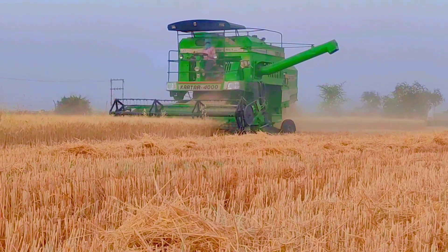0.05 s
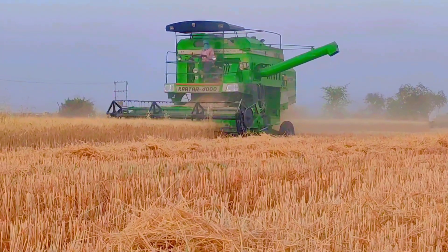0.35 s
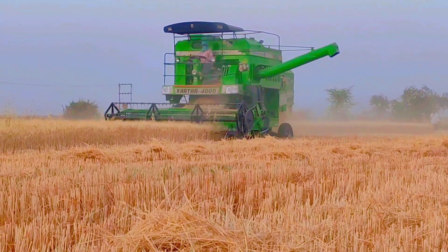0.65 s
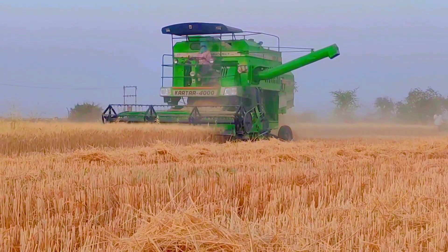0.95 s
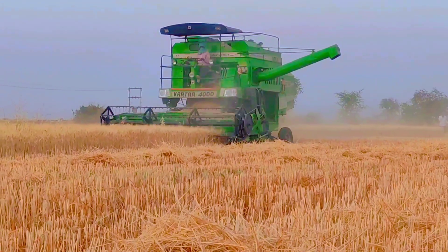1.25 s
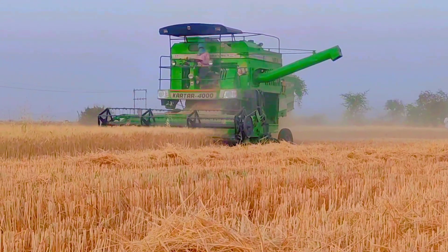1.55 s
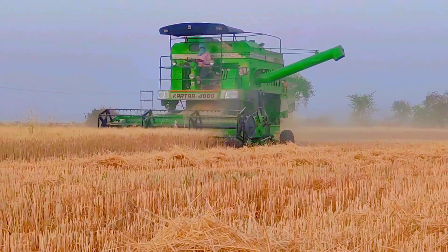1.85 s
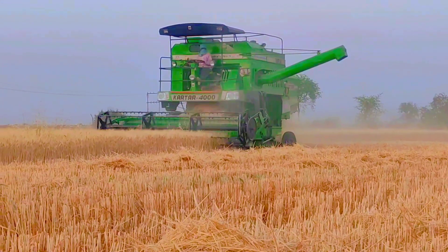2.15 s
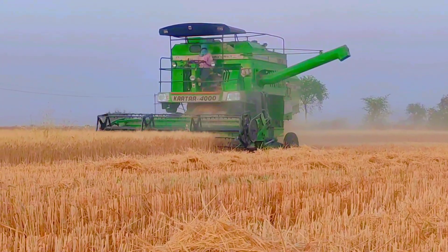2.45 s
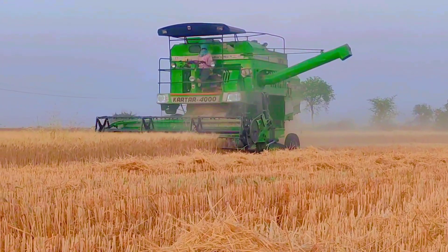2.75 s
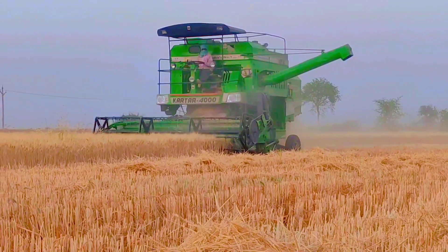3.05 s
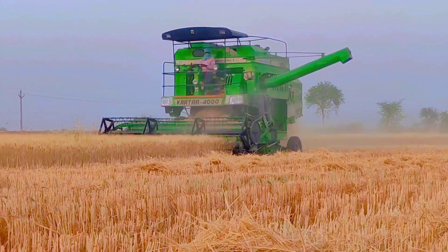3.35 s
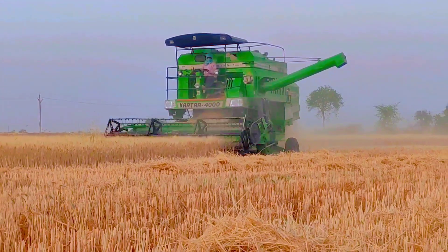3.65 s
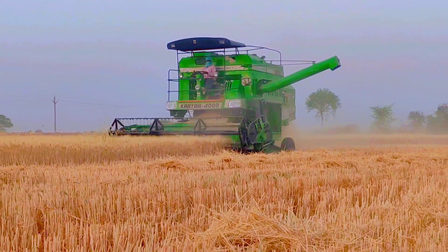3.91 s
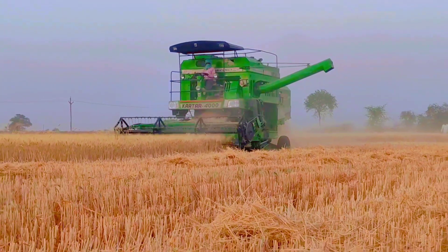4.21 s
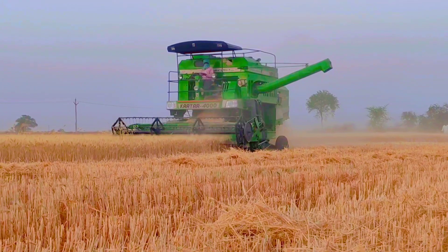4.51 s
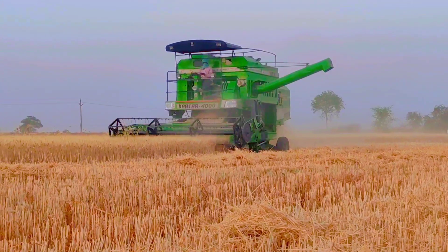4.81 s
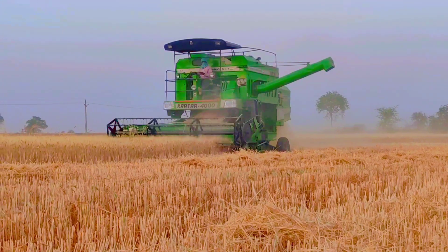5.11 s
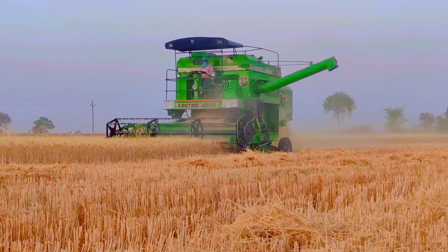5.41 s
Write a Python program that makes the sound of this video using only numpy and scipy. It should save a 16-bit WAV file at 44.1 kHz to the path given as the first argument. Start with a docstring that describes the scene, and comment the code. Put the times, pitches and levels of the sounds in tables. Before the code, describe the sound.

Steady diesel drone, threshing roar and rhythmic straw hiss from a slowly approaching harvester, with brief wind buffets and faint clinks.

```python
"""Open wheat field, one microphone, a combine harvester creeping in from 26 m to about 21 m. From the start its
six-cylinder diesel drones under rumbling panels and the roar of the threshing drum, while the cutter bar chops
dry straw in quick hissing strokes. From 0.7 s on, wind buffets the microphone now and then. At 3 s loose steel
clinks; at 3.4 s a hard knock on the microphone overloads the input. Five more clinks follow between 4 and 4.7
s, and a last buffet comes just before the end."""
import sys
import numpy as np
from scipy import signal
from scipy.fft import rfft, irfft
from scipy.io import wavfile

SR = 44100
rng = np.random.default_rng(int(sys.argv[2]) if len(sys.argv) > 2 else 0)


def store_wav(level_fs):
    """Save 16-bit WAV to argv[1]."""
    pcm = np.round(np.clip(np.atleast_2d(level_fs), -1, 1) * 32767)
    wavfile.write(sys.argv[1], SR, pcm.T.astype(np.int16))


N = 245637

CRANK_HZ = 8.47  # turns a second of the crank that drives the knife


def gain_of(db):
    """Decibels to an amplitude factor."""
    return 10 ** (np.asarray(db) / 20)


def unit_rms(x):
    """Scales to rms 1."""
    return x / np.sqrt(np.mean(x ** 2) + 1e-20)


def clock():
    """Time of every sample in seconds."""
    return np.arange(N) / SR


def colour(x, spectrum, skirt_db=60):
    """Filters x by (Hz, dB) points, falling by skirt_db an octave beyond their ends; rms 1."""
    octave = np.log2(np.fft.rfftfreq(N, 1 / SR) + 1)
    hz, db = np.transpose(spectrum)
    octaves_beyond = abs(octave - np.clip(octave, np.log2(hz[0]), np.log2(hz[-1])))
    curve_db = np.interp(octave, np.log2(hz), db) - skirt_db * octaves_beyond
    return unit_rms(irfft(rfft(x) * gain_of(curve_db), N))


def drift(rate_hz):
    """Random wander of rms 1, up to about the given rate."""
    t = np.arange(0, N / SR + 1, 1 / 200)
    hz = np.fft.rfftfreq(len(t), t[1])
    lowpass = (hz > 0) / (1 + (hz / rate_hz) ** 4)
    wander = irfft(rfft(rng.standard_normal(len(t))) * lowpass, len(t))
    return np.interp(clock(), t, unit_rms(wander))


def grains(per_s, spread_db):
    """Random tiny impacts, mostly small and a few large; rms 1."""
    size = gain_of(spread_db * np.minimum(rng.exponential(1, N), 4))
    polarity = rng.choice([-1, 1], N)
    struck = rng.random(N) < per_s / SR
    return unit_rms(size * polarity * struck)


def tone(turns, db):
    """A sine of the given rms level that follows a count of turns."""
    return np.sqrt(2) * gain_of(db) * np.sin(2 * np.pi * (turns + rng.random()))


def approach(loss_db_per_m=0, start_m=26.3, speed_m_per_s=1.0):
    """Gain from 1 up as the machine nears: 1 / distance, and less standing crop to soak up sound."""
    travelled_m = speed_m_per_s * clock()
    return start_m / (start_m - travelled_m) * gain_of(loss_db_per_m * travelled_m)


def engine(firing_hz=95.43, waver_db=1.4):
    """The governed diesel holds its speed; unequal cylinders add tones between the firing multiples."""
    # exhaust tones: (multiple of the firing rate, taken to the nearest sixth; rms level [dB])
    exhaust = [(0.95, -25.5), (4 / 3, -36), (3 / 2, -46), (5 / 3, -39), (2, -38.5), (5 / 2, -51.5)]
    firings = np.cumsum(firing_hz + .12 * drift(0.94)) / SR
    return sum(tone(np.round(6 * k) / 6 * firings, db + waver_db * drift(2.5)) for k, db in exhaust)


def hum(hz, db, half_width_hz):
    """A narrow resonance shaken at random: its strength and phase wander."""
    phase = 2 * np.pi * hz * clock()
    return gain_of(db) * (drift(half_width_hz) * np.cos(phase) + drift(half_width_hz) * np.sin(phase))


def drives():
    """The knife crank shakes the header; drum, fan and panels hum and whine."""
    # shaking from the knife crank: (multiple of the crank rate, rms level [dB])
    crank_tones = [(5, -48), (9, -45.5), (10, -35), (11, -34), (17, -36.5), (18, -31)]
    # resonances of drum, fan and panels: (frequency [Hz], rms level [dB], half width [Hz])
    resonances = [(81.9, -32, 1.0), (107.8, -37.5, 1.8), (153.1, -31.5, 1.6), (170, -36, 4.4),
                  (457.6, -45, 2.5), (519.4, -48, 9), (984, -45, 8)]
    turns = np.cumsum(CRANK_HZ + 0.013 * drift(1.57)) / SR
    shake = sum(tone(k * turns, db) for k, db in crank_tones)
    whine = sum(hum(*row) for row in resonances)
    return (shake + whine) * unit_rms(approach(loss_db_per_m=0.35))


def rumble(db=-20.5, surge_hz=2.26, crest_s=0.31, swing_db=1.1, uneven_db=0.47, split_hz=140):
    """The big panels rumble, surging as the crop feeds through and brightening as they near."""
    # spectrum of the panels: (frequency [Hz], relative level [dB])
    panel_spectrum = [(8, -30.5), (27, -29), (42, -18.5), (58, -8.5), (78, -1.5), (105, 0.5), (120, -3.5),
                      (165, -1), (192, -5), (210, -10), (236, -13.5), (270, -24.5), (340, -36.5)]
    surge_db = swing_db * np.cos(2 * np.pi * surge_hz * (clock() - crest_s)) + uneven_db * drift(3.0)
    panels = colour(rng.standard_normal(N), panel_spectrum)
    deep = signal.sosfiltfilt(signal.butter(2, split_hz, fs=SR, output="sos"), panels)
    upper = panels - deep
    nearing = deep * unit_rms(approach()) + upper * unit_rms(approach(loss_db_per_m=0.5))
    return gain_of(db + surge_db) * nearing


def threshing(start_db=-31.5, flutter_db=0.61):
    """Crop tumbles through the drum, where countless blows merge into a roar."""
    # spectrum of the drum's roar: (frequency [Hz], relative level [dB])
    roar_spectrum = [(260, -16.5), (340, -11.5), (425, -6), (470, -2), (540, 0), (620, -6.5), (720, -10.5),
                     (830, -9.5), (910, -7), (1010, -7.5), (1130, -13.5), (1280, -21.5), (1430, -18.5),
                     (1600, -30.5)]
    blows = grains(per_s=2500, spread_db=2.0) * gain_of(flutter_db * drift(25))
    return gain_of(start_db) * colour(blows, roar_spectrum) * approach(loss_db_per_m=0.2948)


def knife_stroke(lead_s, rise_share):
    """Swell from -1 to 1 at each pass of the knife, twice a crank turn: a quick bite, a slow release."""
    phase = (2 * CRANK_HZ * (clock() + lead_s)) % 1
    return np.interp(phase, [0, rise_share, 1], [-1, 1, -1])


def cutter(rustle_db=-44.0, hiss_db=-44.5, dull_swing_db=0.84, bright_swing_db=2.0, split_hz=3400):
    """Dry stalks snap in bursts under the knife; the brightest crackle follows the strokes most."""
    # spectrum of the rustling straw: (frequency [Hz], relative level [dB])
    rustle_spectrum = [(1400, -16.5), (1700, -7), (2100, 0.5), (2280, -5.5), (2460, -14), (2740, -3),
                       (3200, -8.5), (3520, -9.5), (3680, -13.5), (3970, -7.5), (4320, -15), (4700, -11.5),
                       (5250, -9), (5600, -17)]
    # spectrum of the hiss of the cut: (frequency [Hz], relative level [dB])
    hiss_spectrum = [(5400, -21.5), (5620, -11.5), (5820, -5), (5890, -1), (6250, -4), (6850, -2.5),
                     (7200, -4), (7600, -7)]
    bite = knife_stroke(lead_s=.0195, rise_share=0.15) * (1 + .3 * drift(8.9))
    straw = colour(grains(per_s=9000, spread_db=0.5), rustle_spectrum)
    dull = signal.sosfiltfilt(signal.butter(4, split_hz, fs=SR, output="sos"), straw)
    bright = straw - dull
    rustle = dull * gain_of(dull_swing_db * bite) + bright * gain_of(bright_swing_db * bite)
    hiss = colour(grains(per_s=9000, spread_db=1.5), hiss_spectrum)
    hiss *= gain_of(bright_swing_db * knife_stroke(lead_s=.023, rise_share=.18))
    feed = gain_of(0.52 * drift(18))  # the crop stands unevenly
    return feed * (gain_of(rustle_db) * unit_rms(rustle) * approach(loss_db_per_m=.15)
                   + gain_of(hiss_db) * unit_rms(hiss) * approach(loss_db_per_m=0.46))


def wind_buffets():
    """Each eddy sucks at the microphone for a cycle or two."""
    # eddies on the microphone: (time [s], peak level [dB], frequency [Hz], half length [s])
    eddies = [(0.669, -6.5, 180, 0.003), (0.685, -13, 80, .012), (1.243, -8.5, 112, 0.0064),
              (2.554, -10, 82, 0.016), (3.2558, -2.5, 95, 0.0073), (3.392, -5.5, 156, 0.0038),
              (5.4045, -5, 141, 0.0021)]
    pressure = np.zeros(N)
    for at_s, db, hz, half_s in eddies:
        age = clock() - at_s
        pressure -= gain_of(db) * np.exp(-(age / half_s) ** 2) * np.cos(2 * np.pi * hz * age)
    return pressure


def clinks(hz=4010, t60_s=0.065, width_hz=130, attack_s=0.0052):
    """A loose steel part rings briefly with a rough, narrow note."""
    # light knocks of steel: (time [s], level the decay starts from [dB])
    knocks = [(3.01, -38.5), (4.068, -34), (4.18, -41), (4.412, -31.5), (4.53, -39), (4.65, -39)]
    steel = np.zeros(N)
    for at_s, db in knocks:
        age = np.maximum(clock() - at_s, 0)
        ring = np.sin(2 * np.pi * np.cumsum(hz + width_hz * drift(50)) / SR)
        attack = 1 - np.exp(-age / attack_s)
        steel += gain_of(db - 60 * age / t60_s) * attack * ring
    return steel


def handling_knock(at_s=3.3969, peak_db=4.0, swing_hz=84, build_s=.0016, decay_s=0.0085):
    """A hard knock on the microphone: a dip builds, snaps partway, eases over into a push and swings out."""
    snap_share, ease_s = 0.55, 0.00052
    age = clock() - at_s
    after = np.maximum(age, 0)
    suction = -np.exp(-(age / build_s) ** 4)
    release = 1 - 2 * (1 - snap_share) * np.exp(-after / ease_s)
    swing = release * np.exp(-after / decay_s) * np.cos(2 * np.pi * swing_hz * after)
    return gain_of(peak_db) * np.where(age < 0, suction, swing)


def scene():
    """The harvester across the field, and the wind and a knock right at the microphone, in mono."""
    harvester = engine() + drives() + rumble() + threshing() + cutter()
    return (harvester + wind_buffets() + clinks() + handling_knock())[None]


def record(dry, ceiling=.86, cutoff_hz=7570):
    """The microphone input overloads with a rounded knee; a steep low-pass then cuts the top treble."""
    clipped = dry / (1 + (dry / ceiling) ** 8) ** (1 / 8)
    lowpass = signal.firwin(1501, cutoff_hz, window=("kaiser", 8), fs=SR)
    return signal.oaconvolve(clipped, lowpass[None], "same")


dry = scene()
out = record(dry)
store_wav(out)
```